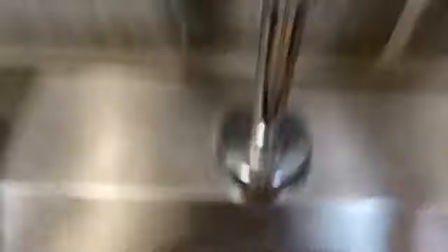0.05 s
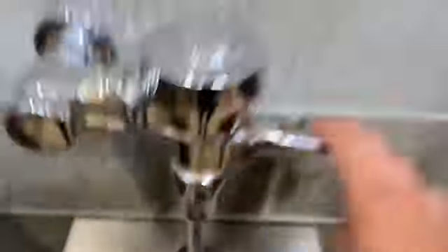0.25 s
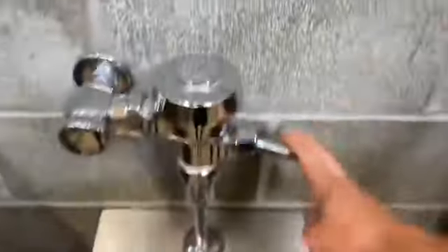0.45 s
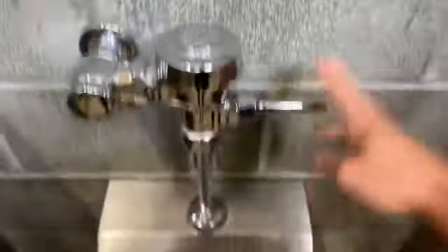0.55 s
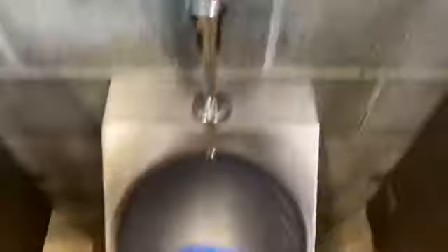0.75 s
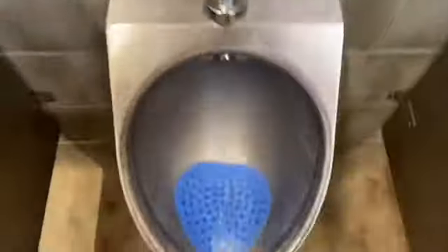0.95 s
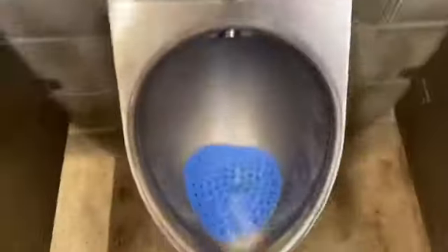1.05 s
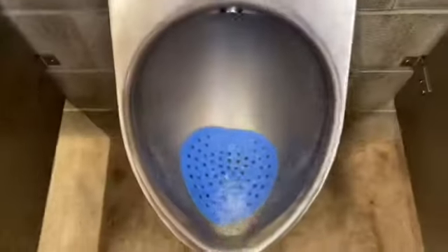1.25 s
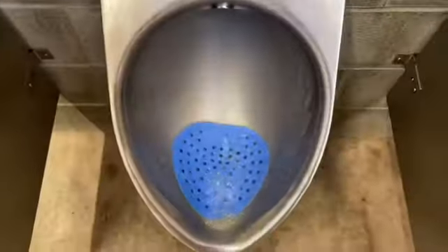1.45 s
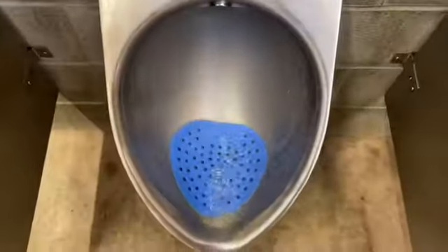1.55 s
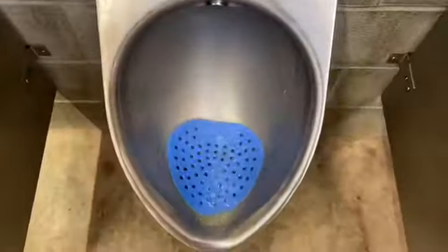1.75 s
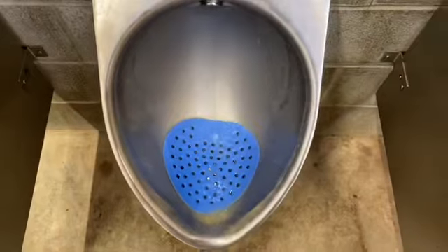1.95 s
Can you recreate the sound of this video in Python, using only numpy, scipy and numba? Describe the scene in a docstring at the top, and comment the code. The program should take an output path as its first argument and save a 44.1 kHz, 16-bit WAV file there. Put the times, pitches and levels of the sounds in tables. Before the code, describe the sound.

A urinal flushes: lever click, booming pipe, hissing rush of water tapering to a trickle

```python
"""Flush valve in a washroom

A hand presses the lever of a flush valve: a click, a booming pipe, then water rushes down a steel bowl.
The water is flickering noise bands with drops, resonances and splashes; pipe and valve are ringing modes,
and gulps are short gliding tones. The rush tapers, the valve thuds shut and a trickle stays, over ventilation
noise and mains hum. The walls are hard, and a phone with two microphone ports is held close."""
import sys
import numpy as np
from scipy import signal
from scipy.fft import rfft, irfft
from scipy.io import wavfile
from scipy.ndimage import uniform_filter1d, map_coordinates
from numba import njit

SR = 44100
rng = np.random.default_rng(int(sys.argv[2]) if len(sys.argv) > 2 else 0)


def dump(signal):
    """Clip the signal to [-1, 1] and save it as 16-bit WAV at the path in sys.argv[1]."""
    limited = np.clip(np.atleast_2d(signal).T, -1, 1)
    pcm = np.round(limited * 32767).astype(np.int16)
    wavfile.write(sys.argv[1], SR, pcm)


N = 88200
F = np.arange(N // 2 + 1) * SR / N  # frequencies in Hz
T = np.arange(N) / SR  # times in seconds

# Rush of water. Each row: time in seconds, then levels in dB of lower treble, middle, upper treble and top.
RUSH_FLOW = [(0.3, -44, -29, -51, -60), (0.31, -42, -35.5, -50, -55), (0.314, -38, -29, -46, -50),
             (0.322, -37, -36, -41, -46), (0.326, -32, -33, -35, -44), (0.336, -34.5, -37, -30, -46),
             (0.366, -31.5, -36.5, -31.5, -44), (0.384, -28, -33.5, -32.5, -40),
             (0.387, -23.5, -34.5, -22.5, -39), (0.432, -25, -31, -26.5, -35.5),
             (0.47, -24, -27.5, -24, -36.5), (0.546, -25, -29.5, -24, -35.5),
             (0.564, -21.5, -24.5, -21, -32), (0.584, -26.5, -29, -27, -38),
             (0.606, -26, -29.5, -24, -34.5), (0.876, -26, -28.5, -24, -34),
             (0.9, -26.5, -31, -27.5, -33.5), (0.976, -28, -31.5, -22.5, -34),
             (1.014, -31.5, -35, -28.5, -36), (1.066, -28, -36, -25.5, -34.5),
             (1.114, -31.5, -39, -28.5, -39.5), (1.27, -34.5, -39, -32.5, -36.5),
             (1.284, -31.5, -34.5, -28, -32), (1.35, -37.5, -40, -37.5, -45), (1.502, -43, -46, -39.5, -47),
             (1.724, -45.5, -61, -48, -51), (1.814, -50, -47.5, -42, -61), (1.914, -39, -42.5, -41, -43),
             (2.0, -43, -41, -42.5, -57)]
# Colour inside the rush. Each row: frequency in Hz, relative level per Hz in dB.
RUSH_COLOUR = [(250, 0), (370, -5.5), (500, -13), (1000, -3.5), (2000, -6.5), (4000, -4), (5500, -7),
               (7500, -3), (11000, 3), (15000, -6.5)]
# Flicker of the water: depth in dB and rate in Hz, shared by all bands or each band's own.
SHARED_FLICKER_DB, SHARED_FLICKER_HZ, OWN_FLICKER_DB, OWN_FLICKER_HZ = 0.46, 14.4, 1.5, 29.89
# Drops: rough number per second, level against the band's noise, spread of sizes,
# ring length in cycles, and share by which the pitch rises over that length.
DROPS_PER_S, DROP_DB, DROP_SCATTER_DB, DROP_CYCLES, DROP_GLIDE = 900, -4.5, 1.5, 22.9, 0.19

# Resonances of spout and pipe while the valve is open. Each row: frequency in Hz, width in Hz, level in dB.
SPOUT_MODES = [(592.9, 5.8, -3.5), (697, 37, -4.5), (722.4, 15, -5), (756, 22, -10.5), (793, 15, -5.5),
               (923, 16, -8.5), (1004, 47, -3), (1056, 21, -10.5), (1121, 33, 0), (1181, 30, -4.5),
               (1425, 27, -10.5), (1467, 39, -3.5), (1712, 25, -7), (2260, 51, -6.5), (2583, 49, -3),
               (2790, 37, -10), (3610, 65, -3.5), (4170, 46, -3.5), (4630, 270, -3), (5200, 29, -2),
               (5515, 320, 0.5)]
# Resonances of the bowl under the trickle. Each row: frequency in Hz, width in Hz, level in dB.
BOWL_MODES = [(714, 80, -6.5), (1086, 130, -4), (1700, 330, 0), (3260, 120, -0.5), (4190, 160, -5.5),
              (4500, 220, -12)]
SPOUT_DB, BOWL_DB = 23.5, 24  # added to the rush's level per Hz
CLOSING_S, CLOSING_SPAN_S = 1, 0.14  # middle and slope of the change from spout to bowl
WANDER_HZ, WANDER_MS = 8, 0.501  # time shifts that slide the pitch as the water column changes

# Separate spurts and splashes. Each row: start in seconds, peak level in dB, time to fall 60 dB in seconds,
# first and second centre frequency in Hz.
SPLASHES = [(0.312, -24, 0.067, 6900, 8200), (0.333, -16.5, 0.11, 6700, 4930),
            (0.3336, -18, 0.062, 2820, 3700), (0.345, -17, 0.11, 2800, 4700),
            (0.386, -16, 0.046, 2900, 5200), (0.3906, -6.5, .05, 2920, 4650),
            (0.4042, -7, 0.043, 2820, 4800), (0.4175, -17.5, 0.21, 2690, 4660),
            (0.458, -9.5, 0.13, 2800, 5070), (0.551, -13, 0.12, 2980, 3960), (0.506, -12, .07, 3280, 4670),
            (0.615, -12, 0.077, 2720, 3750), (0.6437, -8.5, 0.049, 3070, 5560),
            (0.74, -18, 0.064, 3000, 4200), (0.791, -16, 0.07, 2670, 5300), (0.875, -16, .08, 3370, 5270),
            (0.9598, -11, 0.089, 3420, 5900), (1.037, -20, .09, 3400, 4440),
            (1.0844, -14.5, 0.064, 3520, 4100), (1.18, -19, .09, 3350, 4000),
            (1.279, -16, 0.16, 3320, 4360), (1.338, -24, 0.071, 3220, 4100),
            (1.543, -27.5, 0.076, 3100, 4380), (1.474, -26, 0.033, 1500, 3000),
            (1.572, -22, 0.037, 2900, 4340), (1.664, -29, 0.061, 3320, 2970),
            (1.698, -29.5, .05, 3600, 2770), (1.734, -33, 0.12, 4100, 3600),
            (1.787, -29.5, 0.11, 3850, 1000), (1.8143, -33, 0.14, 4200, 3900),
            (1.848, -24, 0.051, 3240, 4200), (1.865, -27, 0.12, 3120, 3800),
            (1.895, -31, 0.076, 6300, 4500), (1.917, -24, .05, 3400, 4630), (1.9497, -31, .09, 3180, 3900)]
SPLASH_DB, SPLASH_WIDTH = -13, 0.16  # rms of each band against the peak; width as share of the centre

# Supply pipe modes; neighbours start in opposition and beat.
# Each row: frequency in Hz, level in dB, time to fall 60 dB in seconds.
PIPE_MODES = [(92, -31, 0.15), (124.5, -9, 0.14), (148.7, 0, 0.36), (175.7, -1.5, 0.28),
              (249.4, -5.5, 0.15), (318, -17, 0.5), (371, -21, 0.59), (580, -9, 0.079), (672, -15, 0.45),
              (773, -18.5, 0.3), (1040, -10.5, 0.068), (1104, -26, 0.1), (1290, -32, 0.15),
              (1510, -35, 0.09)]
# Jolts on the pipe. Each row: start in seconds, level in dB, time constant of the push in milliseconds.
PIPE_JOLTS = [(.241, -9.5, 0.55), (0.28, -12, 1.7), (0.383, -16.5, 1.9), (.46, -8.5, 2.5),
              (0.566, -12, 3.6), (0.611, -17.5, 3.4), (0.719, -20.5, 3.2)]
# Hand, then flow, shaking the pipe. Each row: time in seconds, level of the driving noise in dB.
PIPE_SHAKE = [(0, -69.5), (.07, -64), (.12, -68), (.2, -57), (.235, -77), (.3, -57), (.42, -76),
              (.5, -61.5), (.62, -58), (.7, -64), (.75, -57.5), (.81, -68), (.87, -60), (.93, -67.5),
              (1.2, -78), (1.4, -80)]

# Colour of the lever click. Each row: frequency in Hz, width in Hz, level in dB, time to fall 60 dB in seconds.
CLICK_BANDS = [(3140, 700, -30, 0.15), (4270, 560, -30, 0.098), (5900, 4100, -25.5, 0.028),
               (10600, 15000, -26, 0.045), (4800, 8800, -40, 0.48), (1290, 380, -39, 0.18)]
CLICK_S = .2385
RATTLE_DB, RATTLE_T60_S, RATTLE_HZ = -33, 0.79, 750

# Gulps and longer whistles in the valve. Each row: start in seconds, level in dB, starting pitch in Hz,
# ring length in cycles, share by which the pitch glides over that length.
GULPS = [(0.199, -26, 1080, 16, -0.054), (.239, -16.5, 590, 10.6, -0.14), (.24, -20.5, 1100, 15, -0.039),
         (.268, -21, 770, 21, -0.041), (.286, -21, 1450, 14, 0.16), (.288, -16, 660, 17, 0.0019),
         (.295, -15, 842, 18, 0.066), (0.309, -21, 1060, 16, -0.046), (.327, -22, 642, 30, 0.028),
         (0.349, -29, 1177, 44, -0.072), (0.456, -27, 1123, 44, -0.059), (0.531, -18, 1720, 93, .005),
         (.552, -14, 1133, 52, -0.01), (.61, -21, 1125, 89, -0.015), (.6, -23, 714, 45, 0.02),
         (.73, -18.5, 690.5, 89, 0.1), (0.771, -21, 1130, 35, 0.16), (.845, -13.5, 696, 39, 0.015),
         (1.224, -27, 1210, 10, -0.19), (1.229, -23.5, 900, 12.7, -0.47), (1.245, -30, 1070, 14, .05)]
# Valve body modes. Each row: frequency in Hz, level in dB, time to fall 60 dB in seconds.
VALVE_MODES = [(82.3, -2, 0.3), (107, -6.5, 0.22), (173.4, -5, 0.25), (313, 3, 0.18), (374, -0.5, 0.065),
               (458, -1, 0.054)]
# Thuds of the closing valve. Each row: start in seconds, level in dB.
CLOSING_THUDS = [(1.238, -18), (1.255, -21), (1.282, -28), (1.329, -30)]

# Swish of the reaching hand: peak time, level, time constants of rise and fall, centre.
RUSTLE_S, RUSTLE_DB, RUSTLE_RISE_S, RUSTLE_FALL_S, RUSTLE_HZ = 0.072, -38.5, 0.025, 0.052, 3440
# Low rumble of the moving phone. Each row: time in seconds, level in dB.
GRIP_RUMBLE = [(0, -30.5), (.07, -37), (.16, -35.5), (.24, -30), (.34, -34), (.5, -45), (.7, -46)]
GRIP_HZ = 63

# Colour of the ventilation. Each row: frequency in Hz, relative level per Hz in dB.
AIR_COLOUR = [(25, -56), (55, -2.5), (150, -2), (300, -12), (700, -12.5), (2000, -20), (5000, -27.5),
              (11000, -36), (15000, -72)]
AIR_DB, AIR_FLICKER_DB = -40.5, 4
# Mains hum. Each row: frequency in Hz, rms level in dB.
HUM_TONES = [(120, -43.5), (243, -49)]

# Phase lead of the left port over the right; in the treble it turns steadily, as from a path difference.
# Each row: frequency in Hz, lead in half turns.
PORT_LEAD = [(0, 0), (520, 0), (1200, -.3), (2100, .1), (6200, .1), (7000, 0), (15300, -4), (21525, -7)]
# Balance at the ports. Each row: frequency in Hz, room against direct sound in dB, left minus right in dB.
PORT_BALANCE = [(40, -9, 0.5), (137, -19.5, 0.5), (285, -4.5, 2.5), (710, -4.5, 1.5), (1560, 0.5, 1),
                (2440, -6.5, 2.5), (6500, -6.5, 4), (6760, -19, -2), (15900, -13, 1)]
ROOM_T60_S = 0.17
BASS_CUT_HZ, TOP_HZ = 38, 15750


def water():
    """The rush and the resonances start with the flow; splashes burst out of them."""
    opening = np.clip((T - RUSH_FLOW[0][0]) / 0.0032, 0, 1)
    return (rush() + spout_and_bowl()) * opening + splashes()


def rush():
    """Quarter-octave bands of spray noise and drops flicker together and apart as they follow the flow."""
    out = 0
    shared = walk(SHARED_FLICKER_HZ)
    centres = 250 * 2 ** np.arange(0, 6.1, 1 / 4)
    for hz in centres:
        db = flow_db(hz) + colour(RUSH_COLOUR, hz) + 10 * np.log10(hz / 5)  # hz / 5: effective bandwidth
        db = db + SHARED_FLICKER_DB * shared + OWN_FLICKER_DB * walk(OWN_FLICKER_HZ)
        count = int(DROPS_PER_S * N / SR * hz / centres.sum()) + 4
        falling = level(drops(hz, count), DROP_DB)
        out = out + undb(db) * (band(hz, hz / 4) + falling)
    return out


def drops(hz, count):
    """Drops at random times ring near one pitch; large ones are rarer than small ones."""
    when, how_big, pitch = rng.random((1000, 3))[:count].T
    start = (when * N).astype(np.int64)
    size = undb(np.minimum(-DROP_SCATTER_DB * np.log(how_big), 9))
    return plinks(start, hz * 2 ** (pitch / 4 - 1 / 8), size, 1. * DROP_CYCLES, 1. * DROP_GLIDE, N)


def flow_db(hz):
    """Level per Hz of the rush over time, blended between the four band levels."""
    levels = np.array([curve(RUSH_FLOW, k) for k in (2, 1, 3, 4)])  # from low to high pitch
    per_hz = levels - 10 * np.log10([[800], [2400], [3600], [2600]])  # bandwidths in Hz
    place = np.interp(np.log(hz), np.log([900, 2200, 3800, 5200, 7500, 11000]), [0, 1, 1, 2, 2, 3])
    weights = np.clip(1 - np.abs(place - np.arange(4)), 0, 1)
    return weights @ per_hz


def spout_and_bowl():
    """Spout and pipe resonate while the valve is open, then give way to the bowl under the trickle."""
    shut = .5 + .5 * np.tanh((T - CLOSING_S) / CLOSING_SPAN_S)
    spout = (1 - shut) * undb(SPOUT_DB) * resonances(SPOUT_MODES)
    return spout + shut * undb(BOWL_DB) * resonances(BOWL_MODES)


def resonances(rows):
    """Narrow wavering bands follow the flow, each sliding in pitch."""
    out = 0
    for hz, width, db in rows:
        loudness = undb(flow_db(hz) + db + OWN_FLICKER_DB * walk(OWN_FLICKER_HZ))
        tone = band(hz, width)
        moved = np.arange(N) + WANDER_MS * SR / 1000 * walk(WANDER_HZ)
        out = out + loudness * map_coordinates(tone, [moved], order=3, mode="mirror")
    return out


def splashes():
    """Each spurt or splash is two bands of noise that start at once and die away."""
    out = 0
    for s, db, t60, *centres in SPLASHES:
        for hz in centres:
            out = out + undb(db + SPLASH_DB) * fade(s, t60) * band(hz, hz * SPLASH_WIDTH)
    return out


def supply_pipe():
    """Jolts and noisy shaking make the pipe's modes boom."""
    jolts = sum(blow(*row) for row in PIPE_JOLTS)
    shaking = undb(curve(PIPE_SHAKE)) * rng.standard_normal(N)
    return ring(jolts + shaking, PIPE_MODES)


def lever():
    """The lever clicks in decaying noise bands and rattles in one unsteady band."""
    click = sum(undb(db) * fade(CLICK_S, t60) * band(hz, width) for hz, width, db, t60 in CLICK_BANDS)
    unsteady = undb(RATTLE_DB + 7.2 * walk(67.6))
    return click + unsteady * fade(CLICK_S, RATTLE_T60_S) * band(RATTLE_HZ, 930)


def gulps():
    """Gulps and whistles in the valve are short tones that glide in pitch."""
    out = 0
    for s, db, hz, cycles, glide in GULPS:
        start, pitch = np.array([int(s * SR)]), np.array([1. * hz])
        out = out + plinks(start, pitch, undb([db]), 1. * cycles, 1. * glide, N)
    return out


def closing_valve():
    """Short blows make the valve body ring as it thuds shut."""
    return ring(sum(blow(s, db, 1.0) for s, db in CLOSING_THUDS), VALVE_MODES)


def hand():
    """A soft swish of noise as the hand reaches out, and the low rumble of the grip."""
    span = np.where(T < RUSTLE_S, RUSTLE_RISE_S, RUSTLE_FALL_S)
    swell = np.exp(-np.abs((T - RUSTLE_S) / span))
    swish = undb(RUSTLE_DB) * swell * band(RUSTLE_HZ, 9400)
    return swish + undb(curve(GRIP_RUMBLE)) * band(GRIP_HZ, 64)


def ventilation():
    """Moving air is noise in half-octave bands that waver separately."""
    out = 0
    for hz in 30 * 2 ** np.arange(0, 9.1, .5):
        db = colour(AIR_COLOUR, hz) + 10 * np.log10(hz) + AIR_FLICKER_DB * walk(5.58)
        out = out + undb(db) * band(hz, hz / 2)
    return level(out, AIR_DB)


def mains_hum():
    """Steady low tones with a slightly wandering phase."""
    return sum(level(np.sin(2 * np.pi * hz * T + 0.99 * walk(3.44)), db) for hz, db in HUM_TONES)


def undb(db):
    """Turn dB into a plain factor."""
    return 10 ** (np.asarray(db) / 20)


def level(x, db):
    """Scale a sound to an rms level in dB."""
    return x * undb(db) / np.sqrt(np.mean(x ** 2))


def curve(rows, col=1):
    """Straight lines in time."""
    return np.interp(T, np.array(rows)[:, 0], np.array(rows)[:, col])


def colour(rows, hz, col=1):
    """Straight lines on a log-frequency axis."""
    return np.interp(np.log(hz + 1), np.log(np.array(rows)[:, 0]), np.array(rows)[:, col])


def band(hz, width_hz):
    """Noise in a bell-shaped band, rms 1."""
    bell = np.exp(-2 * ((F - hz) / width_hz) ** 2)
    return level(irfft(rfft(rng.standard_normal(N)) * bell, N), 0)


def walk(rate_hz):
    """Random levels, each held for 1 / rate seconds, then smoothed; spread 1."""
    k = int(SR / rate_hz)
    steps = np.repeat(rng.standard_normal(N // 100), k)[:N]
    smooth = uniform_filter1d(uniform_filter1d(steps, k), k)
    return smooth / smooth.std()


def fade(s, t60):
    """Silent until s, then an exponential decay."""
    return (T > s) * undb(-60 * np.maximum(T - s, 0) / t60)


def blow(s, db, ms):
    """A push that starts at once and fades; its level sets its area."""
    shape = fade(s, ms * np.log(1000) / 1000)
    return undb(db) * shape / shape.sum()


def ring(push, modes):
    """A push drives decaying modes of alternating sign."""
    out = 0
    for k, (hz, db, t60) in enumerate(modes):
        pole = np.exp(2j * np.pi * hz / SR - np.log(1000) / (t60 * SR))
        out = out + (-1) ** k * undb(db) * signal.lfilter([1], [1, -pole], push).imag
    return out


@njit
def plinks(start, hz, size, cycles, glide, n):
    """Short rings that swell, glide in pitch and die."""
    out = np.zeros(n)
    for k in range(len(start)):
        phase, length = 0., cycles * SR / hz[k]
        for i in range(min(int(2 * length), n - start[k])):
            phase += 2 * np.pi * hz[k] * (1 + glide * i / length) / SR
            swell = 1 - np.exp(-6 * i / length)
            out[start[k] + i] += size[k] * swell * np.exp(-3 * i / length) * np.sin(phase)
    return out


def scene():
    """Direct sound reaches the ports with a phase lead; the walls add a smeared copy in opposition."""
    flush = water() + supply_pipe() + lever() + gulps() + closing_valve()
    direct = rfft(flush + hand() + ventilation() + mains_hum())
    walls = rfft(rng.standard_normal(N) * undb(-60 * T / ROOM_T60_S))
    walls /= np.sqrt(uniform_filter1d(np.abs(walls) ** 2, size=60))  # even out the echo's colour
    lead = np.interp(F, *np.array(PORT_LEAD).T) * np.pi / 2  # half of the lead for each port
    sign = np.array([[1], [-1]])  # left, right
    ports = np.exp(1j * sign * lead) + sign * undb(colour(PORT_BALANCE, F)) * walls
    balance = undb(sign * colour(PORT_BALANCE, F, col=2) / 2)
    return irfft(direct * ports * balance, N)


def record(dry):
    """The phone rolls off the deep bass and cuts the top."""
    bass_cut = signal.butter(4, BASS_CUT_HZ, "high", fs=SR, output="sos")
    top_cut = signal.ellip(10, .2, 80, TOP_HZ, fs=SR, output="sos")
    return signal.sosfilt(top_cut, signal.sosfilt(bass_cut, dry))


dry = scene()
out = record(dry)
dump(out)
```